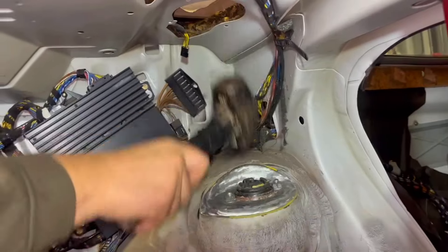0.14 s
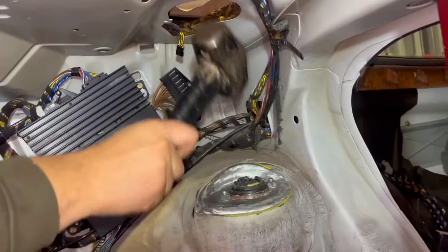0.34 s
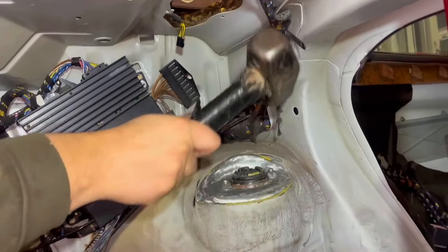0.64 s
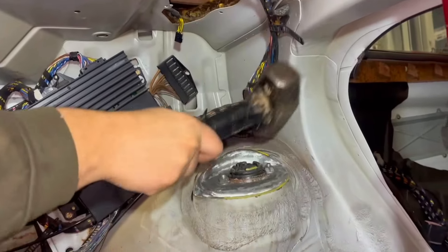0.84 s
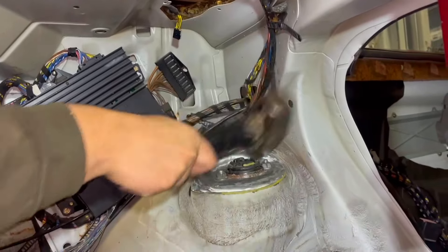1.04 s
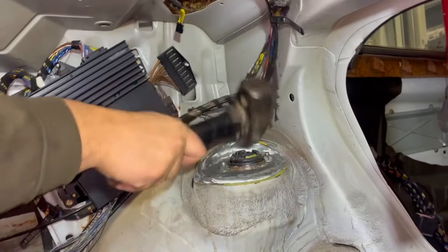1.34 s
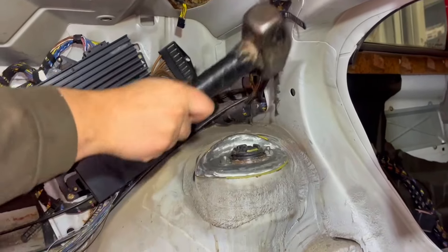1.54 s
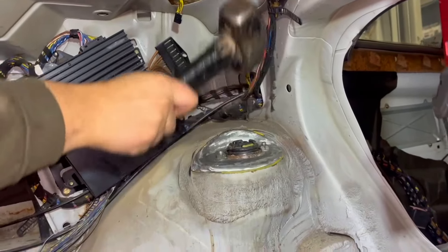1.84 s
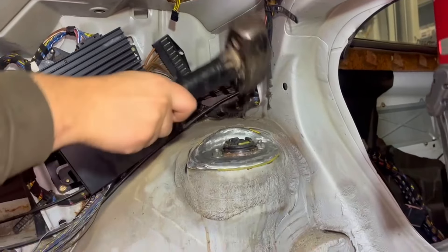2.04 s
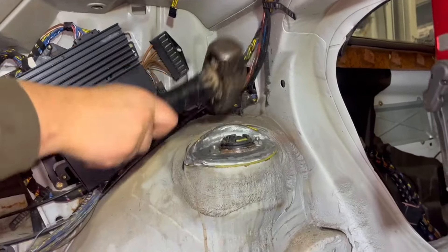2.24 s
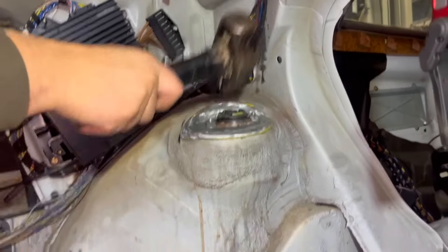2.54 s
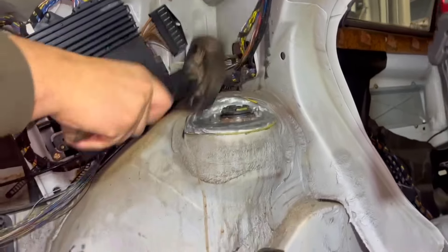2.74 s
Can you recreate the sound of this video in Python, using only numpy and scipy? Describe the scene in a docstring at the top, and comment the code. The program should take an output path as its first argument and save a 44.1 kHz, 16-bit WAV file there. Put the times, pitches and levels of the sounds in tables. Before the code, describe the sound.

A heavy steel hammer strikes a car-body panel in steady rhythm, about three blows a second, each a loud dull clank with brief rattle and low boom, heard close up in stereo in a garage.

```python
"""The boom and ring of a blow already struck die away; then a heavy steel hammer strikes a damped
car-body panel about three times a second. Decaying sinusoids make the panel's modes, the steel and
the shell's boom; shaped noise makes the rattle of loose parts, the garage's soft tail and the room air.
Bending waves bring treble first and bass last; two close ports hear them with unlike level and phase."""
import sys
import numpy as np
from scipy import signal
from scipy.fft import rfft, irfft, next_fast_len
from scipy.io import wavfile

SR = 44100
rng = np.random.default_rng(int(sys.argv[2]) if len(sys.argv) > 2 else 0)


def natural_amplitude(level_db):
    """Convert a level in decibels to a linear amplitude factor, elementwise."""
    exponent = np.asarray(level_db, float) / 20
    return 10 ** exponent


def store_pcm(level_fs):
    """Save levels as 16-bit WAV."""
    pcm = np.round(np.clip(level_fs, -1, 1) * 32767).astype(np.int16)
    wavfile.write(sys.argv[1], SR, np.atleast_2d(pcm).T)


N = 127890

# Hammer blows: first contact t/s, panel ring level/dB, ring above 700 Hz level/dB,
# steel crack level/dB, rattle level/dB, shell boom level/dB
BLOWS = [(-.18, -8, -12.5, -29.5, -12, 4), (0.1227, -11.5, -15, -9, -17, -0.5),
         (0.432, -9.5, -11.5, -9, -15, 0), (0.7444, -19, -17.5, -24, -19, -2),
         (1.06, -14.5, -21.5, -20.5, -17.5, -1), (1.3509, -10.5, -15, -21, -13.5, 0.5),
         (1.630, -7, -9, -17, -10, 1), (1.923, -7.5, -11, -19.5, -12.5, 2),
         (2.196, -10, -16, -23, -13.5, 1.5), (2.467, -10, -15, -28.5, -13, 1),
         (2.756, -35.5, -27.5, -25, -22, -3)]
TRAVEL_S_AT_1K = 0.00321  # bending-wave delay at 1 kHz; it falls as 1 / sqrt(f)
OFF_AXIS_DB = -8  # part heard unlike at the two ports
CRACK_DELAY_S = 0.001479


def at_hz(points, hz):
    """Linear interpolation of a table on a logarithmic frequency axis."""
    f, v = np.transpose(points)
    return np.interp(np.log(hz + 1), np.log(f + 1), v)


def coloured(x, spectrum):
    """Linear filtering of noise: weights its spectrum by a table in dB, then sets the rms to 1."""
    n = x.shape[-1]
    hz = np.arange(n // 2 + 1) * SR / n
    y = irfft(rfft(x) * natural_amplitude(at_hz(spectrum, hz)), n)
    return y / np.sqrt(np.mean(y ** 2))


def add(out, s, sound):
    """Superposition: adds a sound at scene time s; the buffer starts half a second early."""
    i = int(s * SR) + SR // 2
    out[..., i:i + sound.shape[-1]] += sound


def rings(modes, delay_s, swell_s, choke_db=0):
    """Damped modal vibration: each row is silent until its wave arrives, swells, then decays.

    choke_db (dB/s^2) makes the decay ever faster."""
    hz, db, t60 = np.transpose(modes)[:, :, None]
    t = np.maximum(np.arange(int(SR * .45)) / SR - delay_s, 0)
    decay = natural_amplitude(db - 60 * t / t60 - choke_db * t * t)
    swell = 1 - np.exp(-t / swell_s)
    return decay * swell * np.sin(2 * np.pi * hz * t)


def panel(out_len):
    """Modal superposition with dispersive arrival: each contact excites all bending modes unequally.

    The two rows are common and off-axis sound."""
    # Panel modes: f/Hz, level/dB, t60/s before the choke
    panel_modes = np.array([(139.8, -12.5, 0.33), (210.6, -7.5, 0.27), (244.2, 3.5, .12),
                            (260.95, -9.5, 0.41), (327.6, -12.5, 0.33), (397.2, -1.5, 0.29), (480, 3, 0.12),
                            (518.9, 4.5, 0.11), (609.1, 0, 0.12), (743.8, -2, 0.21), (920, 3.5, 0.082),
                            (991.6, -9, 0.21), (1127, -12, 0.23), (1384, -7, 0.069), (1417.6, -9, 0.13),
                            (1651, -12, 0.03), (1571, -12.5, 0.15), (1904, -29.5, 0.3), (2370, -39.5, 0.27),
                            (2306, -16, 0.14)])
    # The head slides and bites again: t/s, thump below 300 Hz level/dB,
    # knock up to 700 Hz level/dB, ring above level/dB
    second_bites = [(0.135, -24.5, -20, -29), (0.444, -36, -60, -24.5), (.751, -11, -14.5, -24.5),
                    (1.068, -16, -29.5, -27.5), (1.358, -18, -14.5, -40), (1.637, -15.5, -42, -26.5),
                    (1.932, -11.5, -26.5, -12.5), (2.205, -15, -10.5, -17.5), (2.477, -11.5, -27, -24.5),
                    (2.763, -21, -28, -28.5)]
    # The dent itself, a short pulse on first contact: f/Hz, level/dB, t60/s
    dent_modes = [(431, -1, 0.0083), (667, 10.5, 0.029), (1090, 0, 0.018)]
    thump_to_hz, mid_from_hz = 300, 700
    mode_scatter_db = 0.5
    detune_share = 0.0083  # each contact bends the panel slightly off pitch
    choke_db_per_s2 = 2501

    out = np.zeros((2, out_len))
    hz = panel_modes[:, :1]
    zone = (hz[:, 0] > thump_to_hz) * 1 + (hz[:, 0] > mid_from_hz)
    arrival_s = TRAVEL_S_AT_1K * np.sqrt(1000 / hz)
    swell_s = 1 / hz  # one cycle
    contacts = [(s, low, low, mid) for s, low, mid, *_ in BLOWS] + second_bites
    for s, *levels_db in contacts:
        scatter, detune, side = rng.standard_normal((3, len(panel_modes)))
        bent = panel_modes.copy()
        bent[:, 0] *= 1 + detune_share * detune
        bank = rings(bent, arrival_s, swell_s, choke_db_per_s2)
        gain = natural_amplitude(np.array(levels_db)[zone] + mode_scatter_db * scatter)
        off_axis_gain = gain * natural_amplitude(OFF_AXIS_DB) * side
        add(out, s, np.array([gain, off_axis_gain]) @ bank)

    dent = -rings(dent_modes, 0.0033, 0.00037).sum(axis=0)
    for s, _, ring_db, *_ in BLOWS:
        add(out[0], s, natural_amplitude(ring_db) * dent)
    return out


def steel(out_len):
    """Impact excitation of stiff modes: a bright crack of milliseconds, then a slower-swelling clang."""
    # Steel-on-steel crack: f/Hz, level/dB, t60/s
    crack_modes = [(926, 6.5, 0.009), (2458, 11.5, 0.0054), (2870, -17.5, 0.021), (3896, 3, 0.0093),
                   (4070, -13, 0.042), (5316, -4.5, 0.011), (8500, -36, .01), (12000, -37.5, .01)]
    # Upper clang of the steel: f/Hz, level/dB relative to the blow's rattle level, t60/s
    clang_modes = [(2323, -13, .05), (2908, -6, 0.037), (3325, 0, 0.02), (3732, -12.5, 0.04),
                   (4304, -21.5, 0.092), (4830, -6, 0.041), (4970, -20, 0.022)]
    clang_scatter_db = 1
    out = np.zeros(out_len)
    crack = rings(crack_modes, CRACK_DELAY_S, 0.00049).sum(axis=0)
    clang = rings(clang_modes, CRACK_DELAY_S, 0.006)
    for s, _, _, crack_db, rattle_db, _ in BLOWS:
        clang_db = rattle_db + clang_scatter_db * rng.standard_normal(len(clang_modes))
        add(out, s, natural_amplitude(crack_db) * crack + natural_amplitude(clang_db) @ clang)
    return out


def knocks(out_len):
    """Local resonance: one note stands out where the head lands."""
    # Hollow on glancing blows, a clank on square ones: t/s, level/dB, f/Hz, t60/s
    knock_notes = [(.1263, -4, 740, .025), (.4355, -4, 780, .025), (.7525, -6, 495, .06),
                   (1.068, -10, 520, .07), (1.356, -16, 920, .06), (1.633, -11, 915, .07),
                   (1.926, -12, 915, .07), (2.199, -13, 915, .07), (2.470, -11, 915, .07),
                   (2.761, -15, 190, .07)]
    out = np.zeros(out_len)
    for s, db, hz, t60 in knock_notes:
        add(out, s, rings([(hz, db, t60)], 0, 0.00082)[0])
    return out


def rattle(out_len):
    """High modal density: small panel modes and loose parts merge into noise, dispersed by bending waves.

    The two rows are common and off-axis sound."""
    # Rattle colour before the blow's own level: f/Hz, relative spectral level/dB (per Hz)
    rattle_colour = [(150, -2.5), (300, -13.5), (600, 3), (1000, -3.5), (1500, -4.5), (1950, -19),
                     (2300, -16), (3000, -18.5), (4400, -16.5), (5300, -19.5), (6200, -30.5), (7000, -45),
                     (9000, -48.5), (10200, -72), (11500, -57.5), (13500, -52), (15000, -73)]
    hold_s, t60_s, swell_s = 0.02, 0.084, 0.0018
    grains_per_s = 2500
    small_modes_db = -1  # against the ring above 700 Hz

    out, n = np.zeros((2, out_len)), SR // 4
    t, hz = np.arange(n) / SR, np.arange(n // 2 + 1) * SR / n
    shape = (1 - np.exp(-t / swell_s)) * natural_amplitude(-60 * np.maximum(t - hold_s, 0) / t60_s)
    # This phase has a group delay of TRAVEL_S_AT_1K * sqrt(1000 / hz)
    late_bass = np.exp(-4j * np.pi * TRAVEL_S_AT_1K * np.sqrt(1000 * hz))
    for s, _, ring_db, _, rattle_db, _ in BLOWS:
        grain = rng.random(n) < grains_per_s / SR
        grains = rng.standard_normal((2, n)) * (0.74 + grain * 0.56)
        burst = shape * coloured(grains, rattle_colour)
        # Small modes up to 1300 Hz give way to loose parts above 2300 Hz
        level = natural_amplitude(np.interp(hz, (1300, 2300), [ring_db + small_modes_db, rattle_db]))
        burst = irfft(rfft(burst) * late_bass * level, n)
        add(out, s, burst * [[1], [natural_amplitude(OFF_AXIS_DB)]])
    return out


def shell(out_len):
    """Low-order modal resonance: the whole car body booms late and low."""
    # Shell modes, alike on every blow: f/Hz, level/dB, t60/s
    shell_modes = [(57.5, -37, 1), (71.25, -15, 0.16), (78.43, -23, 0.36), (98.1, -30.5, 0.37),
                   (111.4, -18.5, 0.24)]
    out = np.zeros(out_len)
    boom = rings(shell_modes, 0.014, 0.005).sum(axis=0)
    for s, *_, boom_db in BLOWS:
        add(out, s, natural_amplitude(boom_db) * boom)
    return out


def two_ports(x):
    """Interchannel difference: each port hears the near sound with its own level and phase."""
    # Phase lead of the left port over the right: f/Hz, phase/rad
    left_leads = [(0, 0), (200, -.2), (430, -.8), (690, -2.0), (950, -.8), (1210, -1.1), (1810, .1),
                  (2070, -1.0), (2500, 1.5), (2930, .5), (3450, .5), (3960, 0), (4480, -.2), (4820, -.8),
                  (5940, -.7), (8000, 1.0), (12000, .8)]
    # Level of the left port over the right: f/Hz, level/dB
    left_louder = [(60, -1), (100, 2.5), (170, 12), (280, 8), (460, 5.5), (760, 0.5), (1260, 2),
                   (2090, 8.5), (3480, -3.5), (5780, 2.5)]
    hz = np.arange(len(x) // 2 + 1) * SR / len(x)
    half = natural_amplitude(at_hz(left_louder, hz) / 2) * np.exp(.5j * at_hz(left_leads, hz))
    return irfft(rfft(x) * np.array([half, 1 / half]), len(x))


def garage(x):
    """Diffuse reverberation: convolution with noise whose half-octave bands each decay at their own rate."""
    # Tail colour before the overall tail level: f/Hz, relative level/dB
    tail_colour = [(50, -14.5), (120, 0.5), (300, -1.5), (600, -7.5), (1200, -6.5), (2200, -7),
                   (4500, -28.5), (6500, 7), (12000, -13.5)]
    # Reverberation time: f/Hz, t60/s
    tail_t60 = [(60, 0.97), (300, 1), (1000, 0.64), (3000, 1), (6000, .6)]
    tail_db, onset_s = -22, 0.01
    n, t = SR, np.arange(SR) / SR
    bins_hz = np.arange(n // 2 + 1)  # one second of noise: bins 1 Hz apart
    shared, own = rng.standard_normal(n), rng.standard_normal((2, n))
    like = np.where(bins_hz < 110, 1, 0.17)  # long waves reach both ports alike
    white = np.sqrt(like) * rfft(shared) + np.sqrt(1 - like) * rfft(own)
    octave, tail = np.log2(bins_hz + 1), 0
    for centre in np.arange(5, 14.5, .5):
        centre_hz = 2 ** centre
        band = irfft(white * np.clip(1 - 2 * abs(octave - centre), 0, 1), n)
        band_db = at_hz(tail_colour, centre_hz) - 60 * t / at_hz(tail_t60, centre_hz)
        tail = tail + band * natural_amplitude(band_db)
    tail = tail * (1 - np.exp(-t / onset_s)) / np.sqrt(SR / 20)
    return natural_amplitude(tail_db) * signal.fftconvolve(x[None], tail, axes=1)[:, :len(x)]


def room_air():
    """Stationary noise under a slow envelope: coloured room air, nearly alike at both ports."""
    # Room air colour: f/Hz, relative spectral level/dB (per Hz)
    air_colour = [(15, -44.5), (30, -16), (76, -3.5), (110, -10.5), (162, -13.5), (270, -8), (409, -8),
                  (800, -21.5), (1490, -27), (1900, -37), (3000, -38), (4600, -33), (5700, -47),
                  (6400, -66.5), (7200, -100), (13700, -125)]
    # The room air swells and sinks: t/s, level/dB
    air_level = [(0.0, -44.5), (0.35, -44.5), (0.65, -47), (1.15, -57.5), (1.3, -56.5), (1.44, -45),
                 (1.55, -54.5), (2.9, -51)]
    air = rng.standard_normal(N) + 0.1 * rng.standard_normal((2, N))
    level_db = np.interp(np.arange(N) / SR, *np.transpose(air_level))
    return natural_amplitude(level_db) * coloured(air, air_colour)


def scene():
    """Linear superposition of the blows, their tail and the room air."""
    n = next_fast_len(N + 2 * SR)
    near, off_axis = panel(n) + rattle(n)
    near = near + steel(n) + knocks(n)
    heard = two_ports(near) + shell(n)
    heard = heard + off_axis * [[1], [-1]]  # opposite sign at the two ports
    heard = heard + garage(near)
    return heard[:, SR // 2:SR // 2 + N] + room_air()


def roll_off(x):
    """The treble ends steeply here."""
    return signal.sosfilt(signal.butter(12, 16500, fs=SR, output="sos"), x)


def record(dry):
    """Dynamic range compression: low cut, a limiter that ducks on peaks, soft saturation, top cut."""
    limit_db, release_db_per_s, attack_s = -4, 146, 0.003
    ceiling = 1.3  # amplitude the rounded peaks approach
    low_cut = signal.butter(4, 45, "high", fs=SR, output="sos")
    top_cut = signal.butter(2, 11000, fs=SR, output="sos")
    x = signal.sosfilt(low_cut, dry)
    over_db = np.maximum(20 * np.log10(abs(x).max(axis=0) + 1e-9) - limit_db, 0)
    # Peak hold falling at a constant rate in dB, then smoothed
    ramp = release_db_per_s * np.arange(N) / SR
    held_db = np.maximum.accumulate(over_db + ramp) - ramp
    r = np.exp(-1 / (attack_s * SR))
    duck_db = signal.lfilter([1 - r], [1, -r], held_db)
    x = ceiling * np.tanh(x * natural_amplitude(-duck_db) / ceiling)
    x = signal.sosfilt(top_cut, x)
    return roll_off(x)


dry = scene()
out = record(dry)
store_pcm(out)
```